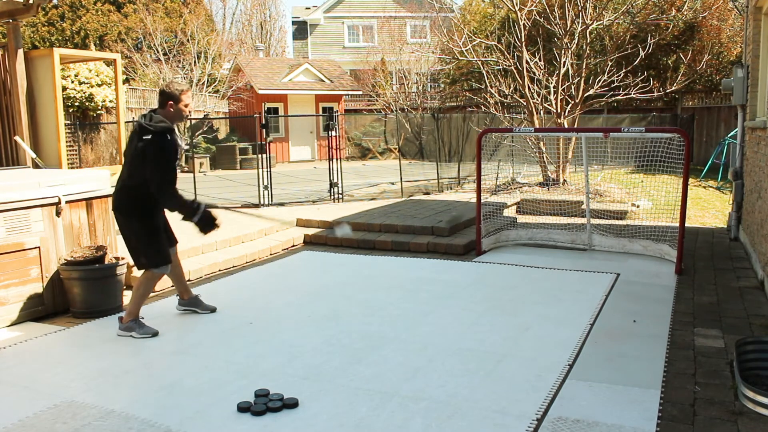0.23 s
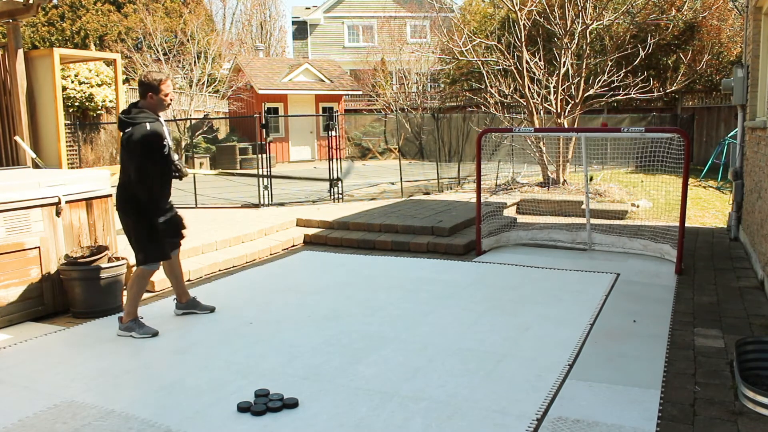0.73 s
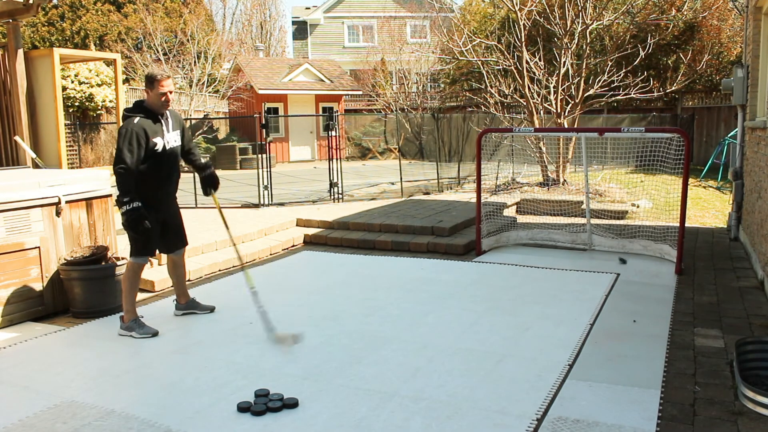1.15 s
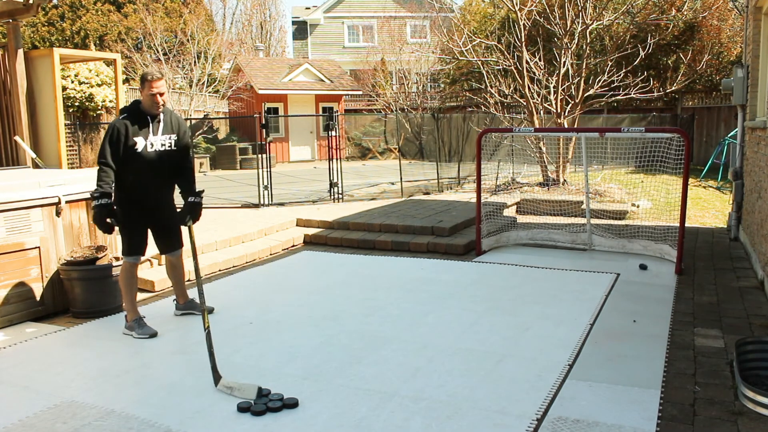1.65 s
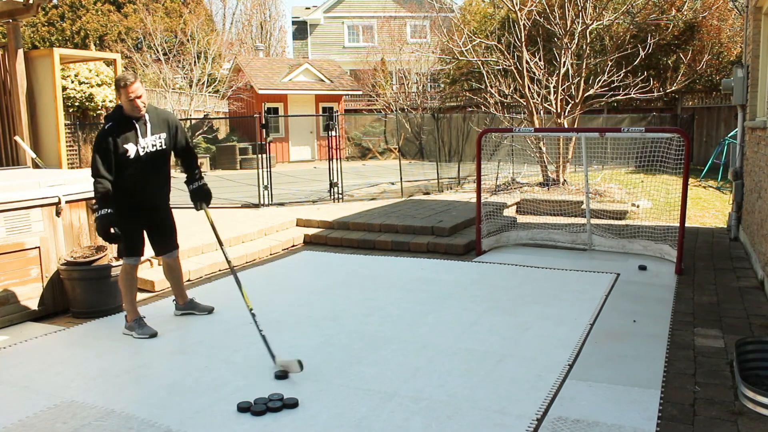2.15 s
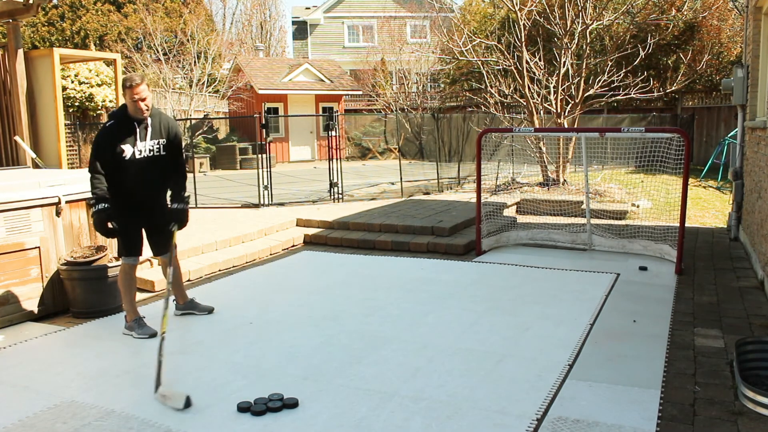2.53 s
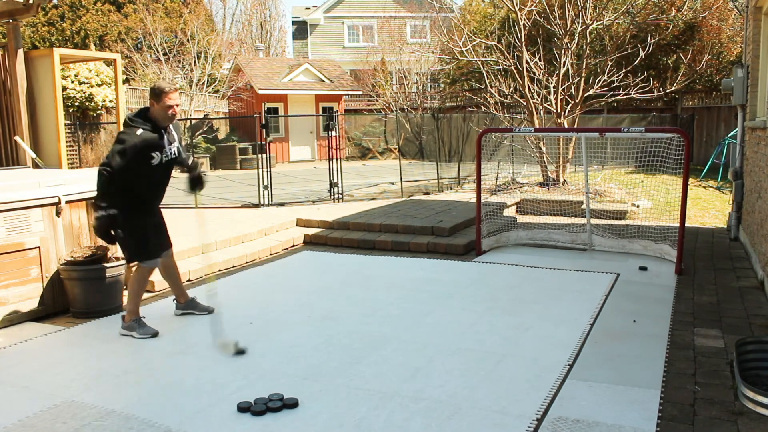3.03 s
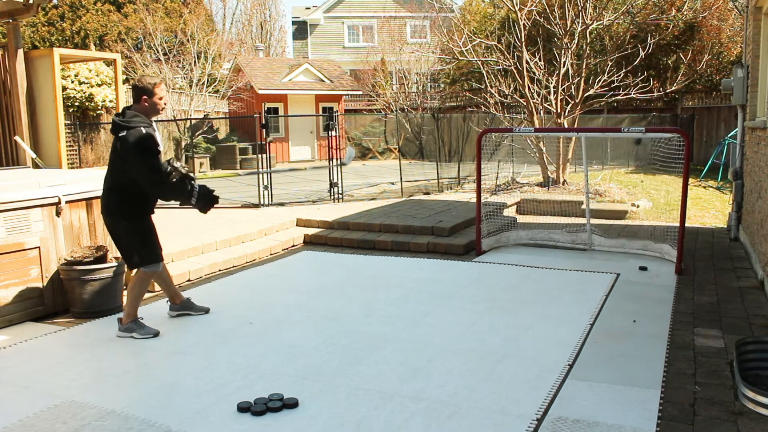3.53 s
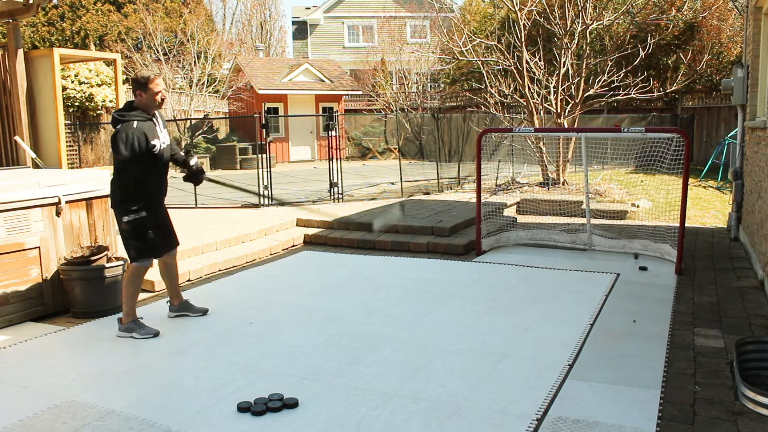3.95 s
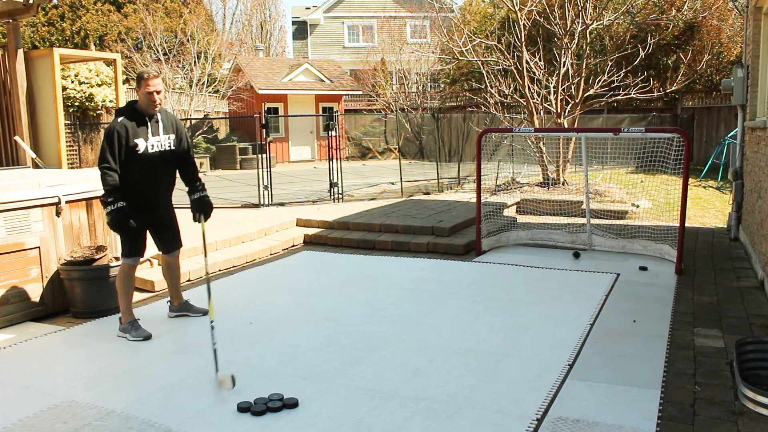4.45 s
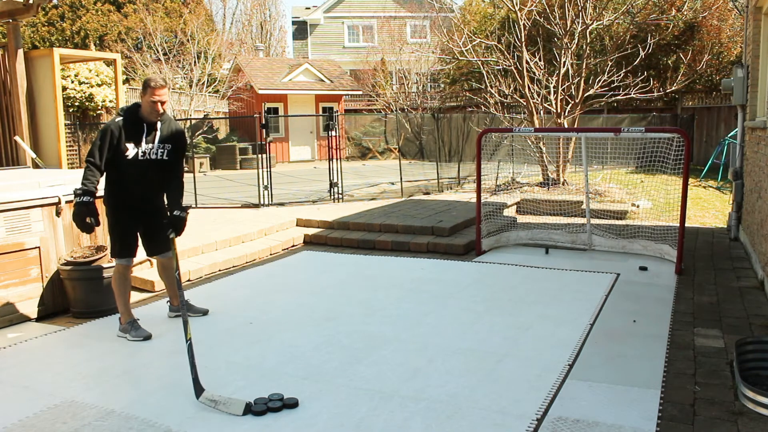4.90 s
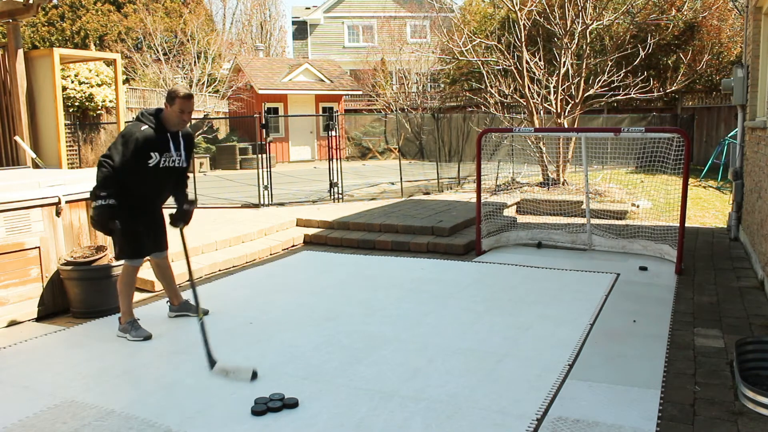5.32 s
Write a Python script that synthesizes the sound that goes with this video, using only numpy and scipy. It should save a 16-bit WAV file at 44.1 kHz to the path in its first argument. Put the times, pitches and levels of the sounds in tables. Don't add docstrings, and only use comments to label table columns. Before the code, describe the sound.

A quiet back yard with faint traffic hum and slight hiss, the stick and pucks close in stereo. A scraping sweep flicks a puck away at about 0.15 s with light clicks. It swishes into the net around 0.55 s and again at 0.8 s, with a short steel ring. A distant saw spins up from 0.2 s, whines high and thin, and stops near 3 s. A heavy puck drop at 1.05 s leads to the loudest hollow slap at 1.25 s, a softer one at 1.55, small taps and rocking, then crisp slaps at 2.15 and 2.55. Soft knocks and a second scraping flick come around 2.9 to 3.2 s, with a very faint net swish at 3.6. A bright clack at 4.0 and a low slap at 4.25 precede a long fading glide and small taps until 4.75. A last scrape swells from 5.2 s. House and fence add brief echoes.

```python
import sys
import numpy as np
from scipy import signal
from scipy.fft import rfft, irfft, next_fast_len
from scipy.io import wavfile
from scipy.ndimage import uniform_filter1d, map_coordinates

SR = 44100
rng = np.random.default_rng(int(sys.argv[2]) if len(sys.argv) > 2 else 0)


def magnitude_from_level(level_db):
    exponent = np.asarray(level_db, float) / 20
    return 10 ** exponent


def inscribe(sig):
    pcm = np.round(np.clip(np.atleast_2d(sig).T, -1, 1) * 32767)
    wavfile.write(sys.argv[1], SR, pcm.astype(np.int16))


N = 245618
TIME = np.arange(N) / SR


def unit(x):
    return x / np.sqrt(np.mean(x ** 2) + 1e-20)


def along(points, hz):
    f, v = np.transpose(points)
    return np.interp(np.log(hz + 1), np.log(f + 1), v)


def wobble(rate):
    return map_coordinates(rng.standard_normal(int(N * rate / SR) + 4), [TIME * rate], order=1)


def filtered(x, response):
    m = 2 * next_fast_len(N // 2 + SR // 4)
    gain = response(np.fft.rfftfreq(m, 1 / SR))
    return irfft(rfft(x, m) * gain / np.sqrt(np.mean(abs(gain) ** 2)), m)[..., :N]


def colour(points):
    def response(hz):
        c = irfft(np.log(magnitude_from_level(along(points, hz)) + 1e-6))
        c[1:len(c) // 2] *= 2
        c[len(c) // 2 + 1:] = 0
        return np.exp(rfft(c))[:len(hz)]
    return response


def stereo(pair):
    # frequency in Hz, left-right likeness from 0 to 1.
    alike = [(100, 0.93), (500, 0.9), (2000, 0.62), (8000, 0.1)]
    m = next_fast_len(N)
    hz = np.fft.rfftfreq(m, 1 / SR)
    turn = np.arccos(np.clip(along(alike, hz), 0, 1)) / 2
    mid, side = irfft(rfft(pair, m) * [np.cos(turn), np.sin(turn)], m)[:, :N]
    return np.array([mid + side, mid - side])


def grit(rough_db):
    return unit(rng.standard_normal((2, N)) * magnitude_from_level(rough_db * (wobble(250) + wobble(1500))))


def add(track, s, swell, t60, db):
    part = track[..., round(s * SR):][..., :SR * 3 // 4]
    t = TIME[:part.shape[-1]]
    part += magnitude_from_level(db) * (1 - np.exp(-t / swell)) * magnitude_from_level(-60 * t / t60)


def tile(f):
    # resonance in Hz, its width in Hz, level in dB.
    tile_modes = [(233, 65, -12.5), (356.3, 59.5, 3), (439.3, 114.4, 3), (524.4, 107, 5.5),
                  (649.5, 76, 4.5), (733.5, 86.5, 1.5), (950, 220, -4.5)]
    total = 0
    for k, (centre, width, db) in enumerate(tile_modes):
        sign = (-1) ** k
        total = total + sign * magnitude_from_level(db) * 1j * f * width / (centre * centre - f * f + 1j * f * width)
    return total * (1j * f / (200 + 1j * f)) ** 3


def bodies(thud, clack, crack, edge):
    # frequency in Hz, level in dB per Hz.
    blade = [(600, -34), (1000, 3.5), (1300, 1), (1900, -0.5), (2500, -2), (3100, -4), (4000, -9.5),
             (5500, -15.5), (9000, -45.5)]
    return filtered(thud, tile) + filtered(clack, colour(blade)) + filtered(crack, colour(edge))


def contacts():
    # start in seconds, tile thud in dB, blade clack in dB over the thud,
    # bright crack in dB over the thud, blade note in Hz.
    slaps = [
        (1.235, -2, -11, -14, 2044),
        (1.538, -13.5, -6, -24.5, 2630),
        (2.13, -8.5, -8, -8, 1900),
        (2.563, -4, -13.5, -16.5, 2147),
        (4.253, -2.5, -8.5, -11.5, 1570),
    ]
    landings = [
        (1.059, -3.5, -4.5, -15, 1850),
        (4.029, -20, 3, -6, 3000),
        (4.209, -12, -6.5, -24, 1750),
    ]
    snaps = [
        (0.231, -36, 9.5, -31.5, 1120),
        (3.001, -24.5, -19, -33, 1500),
        (3.046, -15.5, -24, -37, 1750),
        (3.077, -42, 2, 0, 1400),
        (3.136, -24.5, -0.5, -20.5, 1510),
        (4.018, -10.5, 7.5, -10, 2750),
        (5.453, -22.5, -7.5, -15, 1510),
    ]
    # start in seconds, tile thud in dB, blade clack in dB over the thud,
    # blade note in Hz.
    catches = [
        (0.098, -21.5, -5.5, 3140),
        (0.15, -32.5, 2.5, 1930),
        (2.201, -18.5, -25, 1770),
        (2.432, -18.5, -13.5, 2360),
        (2.48, -23, -10, 1480),
        (3.054, -24, -1, 1410),
        (3.194, -28.5, 3, 2020),
        (4.426, -25.5, -5, 1740),
    ]
    taps = [(1.358, -25.5, -27, 2370), (1.625, -26.5, -15, 1490), (2.084, -34, -9.5, 2550),
            (2.242, -22.5, 0, 1790), (2.368, -34, -6, 1550), (2.657, -17.5, -7, 1856),
            (2.878, -41, -0.5, 1624), (2.953, -26.5, -26, 1400), (4.587, -30.5, -7.5, 2600),
            (4.628, -29, -12, 1460), (4.655, -24.5, -10, 2230), (4.724, -31, -21, 1470),
            (4.747, -52, -8, 2340), (5.438, -17.5, -11, 1460)]
    rocks = [
        (1.717, -32, -17.5, 2340),
        (1.852, -32, -12.5, 2310),
        (1.966, -37, -7.5, 2710),
        (2.997, -22.5, -20, 1500),
        (4.956, -35, -16.5, 1420),
    ]
    blow_list = []
    for rows, t60 in ((slaps, .12), (landings, 0.17), (snaps, .06)):
        blow_list += [(s, db, clack, crack, t60, hz) for s, db, clack, crack, hz in rows]
    for rows, edge_db, t60 in ((catches, -11, 0.15), (taps, -32, 0.15), (rocks, -18.5, 0.32)):
        blow_list += [(s, db, clack, clack + edge_db, t60, hz) for s, db, clack, hz in rows]
    return blow_list


def blows():
    # frequency in Hz, level in dB per Hz.
    crack_edge = [(2500, -48.5), (4000, -1), (5600, -3.5), (7000, 4.5), (8300, 4), (9800, -2.5),
                  (12000, -13.5), (14000, -31), (16500, -57.5)]
    rattle, push, notes = np.zeros((3, N)), np.zeros((3, 1, N)), np.zeros((2, N))
    force = np.array([stereo(grit(rough_db=1.2)) for _ in rattle])
    for s, db, clack_db, crack_db, t60, note_hz in contacts():
        soft_db = -.12 * db
        start = round(s * SR)
        add(rattle[0], s, .0015, 1.31 * t60, db - 9)
        add(rattle[1], s, .0005, t60, db + clack_db - 2.5 - soft_db)
        add(rattle[2], s, .0003, 0.84 * t60, db + crack_db - 6.5)
        push[:, 0, start] += magnitude_from_level([db + 13.5, db + clack_db + 8.0, db + crack_db + 13])
        knock = np.zeros(SR // 4)
        add(knock, 0, .0005, 0.78 * t60, db + clack_db + 3 + 2.3 * soft_db)
        spot = slice(start, start + SR // 4)
        source = force[1][:, spot]
        resonance = signal.iirpeak(note_hz, 4.5, SR)
        once = signal.lfilter(*resonance, knock[:source.shape[1]] * source)
        notes[:, spot] += signal.lfilter(*resonance, once)
    return notes + bodies(*(rattle[:, None] * force + push), crack_edge)


def sweep_strokes():
    # release in seconds, touch in seconds before release, full pressure in seconds before release,
    # tile rumble in dB, blade rasp in dB over the rumble.
    sweeps = [
        (0.156, .38, 0.18, -30.5, 0.5),
        (3.214, 0.34, .17, -28.5, -0.5),
        (5.62, 0.46, 0.15, -29, -2),
    ]
    flick_db = 9.5
    strokes = []
    for go, touch, full, db, rasp in sweeps:
        # time in s, pressure in dB, rasp from blade speed in dB
        stages = ((go - touch, -25.5, -8),
                  (go - touch + 0.13, -11.5, 0),
                  (go - full, 0, 0),
                  (go - 0.032, -7, -1.5),
                  (go, -7, flick_db),
                  (go + 0.047, -34.5, flick_db),
                  (go + .21, -47, 2 * flick_db))
        stroke = []
        for s, press, speed in stages:
            creep_hiss_db = -3 * (s == go - touch)
            stroke.append((s, db + press, rasp + speed, rasp + speed - 9 + creep_hiss_db))
        strokes.append(stroke)
    return strokes


def glide_strokes():
    # start in seconds, length in seconds, tile rumble in dB.
    glides = [
        (1.28, .25, -30),
        (2.154, 0.33, -34),
        (4.298, 0.673, -28.5),
    ]
    skid_s, skid_hiss_db, roll_hiss_db = 0.2, -17.5, -21.5
    strokes = []
    for s, length, db in glides:
        stages = ((0, skid_hiss_db), (min(skid_s, length), skid_hiss_db),
                  (min(skid_s + 0.026, length), roll_hiss_db), (length, roll_hiss_db))
        strokes.append([(s + t, db - 40.5 * t, -14, hiss) for t, hiss in stages])
    return strokes


def slides():
    # frequency in Hz, level in dB per Hz.
    slide_hiss = [(3000, -31.5), (4500, -5.5), (6000, -3), (8500, 2.5), (10000, -4), (12000, -19),
                  (16500, -47.5)]
    corners = []
    for stroke in sorted(sweep_strokes() + glide_strokes()):
        before, after = stroke[0][0] - .02, stroke[-1][0] + .03
        corners += [(before, -90, 0, 0), *stroke, (after, -90, 0, 0)]
    times, *curves = np.transpose(corners)
    rumble_db, rasp_db, hiss_db = (np.interp(TIME, times, curve) for curve in curves)
    chatter = 3.2 * np.minimum(wobble(45), 1.1)
    levels = (rumble_db + chatter - 3.0,
              rumble_db + rasp_db + 0.36 * chatter - 2.5,
              rumble_db + hiss_db - 3.5)
    return bodies(*[magnitude_from_level(db) * stereo(grit(rough_db=1.7)) for db in levels], slide_hiss)


def goal():
    # start in seconds, level in dB, bright fizz in dB over the level,
    # steel ring in dB over the level, swish t60 in seconds.
    net_hits = [
        (0.546, -42.5, -3, -16, .15),
        (0.566, -25.5, -22.5, -31.5, 0.091),
        (0.591, -34, -13.5, -16, 0.24),
        (0.798, -23.5, -8.5, -15.5, 0.12),
        (0.819, -28.5, -3.5, 2, 0.22),
        (3.586, -51, -1.5, -14, 0.19),
        (3.601, -40.5, -19, -20.5, 0.12),
        (3.626, -39, -29, -38.5, 0.16),
        (3.67, -36, -15, -14, .14),
    ]
    # frequency in Hz, level in dB, t60 in seconds.
    frame = [(2370, -13, 1), (2360, -6.5, 0.36), (1400, -7, 0.087), (2960, 2.5, 0.099), (3990, 2.5, 0.04),
             (6400, -21.5, .25), (6670, -15, .15), (6600, -22.5, 0.45)]
    # frequency in Hz, level in dB per Hz.
    mesh_body = [(70, -39.5), (150, -10.5), (260, -12.5), (700, -2.5), (1100, -1.5), (2300, -2),
                 (5000, -12), (6500, -25), (11000, -82.5)]
    net_fizz = [(3000, -21), (4500, 0), (7000, 0), (10000, -11.5), (16000, -28)]
    swell_s = .008
    swish, fizz = np.zeros((2, N))
    tube = np.zeros((len(frame), N))
    for s, db, bright_db, ring_db, t60 in net_hits:
        add(swish, s, swell_s, t60, db - 2.5)
        add(fizz, s, swell_s, t60, db + bright_db - 2)
        for mode, (_, level_db, life) in zip(tube, frame):
            add(mode, s, 0.011 * life, life, db + ring_db + level_db)
    ring = 0
    for mode, (hz, *_) in zip(tube, frame):
        beating = magnitude_from_level(hz / 1800 * wobble(90))
        ring = ring + mode * beating * np.sin(2 * np.pi * hz * TIME)
    mesh = filtered(swish * stereo(grit(rough_db=3.0)), colour(mesh_body))
    bright = filtered(fizz * stereo(grit(rough_db=0.5)), colour(net_fizz))
    return mesh + bright + ring * magnitude_from_level([[-1.5], [1.5]])


def yard(x):
    # frequency in Hz, t60 in seconds.
    linger = [(300, 0.21), (1000, 0.61), (3000, 0.84), (6000, 0.2), (12000, 0.09)]
    hz, t, z = signal.stft(x.mean(0), SR, nperseg=256)
    hop = t[1] - t[0]
    power_in = uniform_filter1d(abs(z) ** 2, size=5, axis=0)
    keep = magnitude_from_level(-120 * hop / along(linger, hz))
    power = np.array([signal.lfilter([0, 0, 0, 1 - k], [1, -k], p) for k, p in zip(keep, power_in)])
    late = round(0.095 / hop)
    power[:, late:] += 0.056 * power[:, :-late].copy()
    noise = signal.stft(stereo(rng.standard_normal((2, N))), SR, nperseg=256)[2]
    noise = noise / np.sqrt(np.mean(abs(noise) ** 2))
    return signal.istft(noise * np.sqrt(power), SR, nperseg=256)[1][:, :N]


def saw():
    # time in seconds, tooth rate in Hz.
    saw_speed = [
        (0.199, 1870),
        (.44, 2190),
        (.7, 2370),
        (1.0, 2430),
        (1.5, 2400),
        (1.8, 2447),
        (2.08, 2603),
        (2.5, 2580),
        (3.02, 2550),
    ]
    s, hz = np.transpose(saw_speed)
    turns = np.cumsum(np.interp(TIME, s, hz) * (1 + .006 * wobble(200))) / SR
    edges = s[0], s[0] + .06, s[-1] - 0.17, s[-1]
    level = -61 + 2.5 * TIME + np.interp(TIME, edges, (-10, -0.5, -3, -15), -60, -60)
    clears_s, dulls_s = .6, 3.5
    high = -14.5 - 12 * np.exp(-(TIME / clears_s) ** 2) - 6 * (TIME / dulls_s) ** 6
    second = np.interp(TIME, (.8, 1.8, 2.9), (-4, -6, -12))
    teeth = 0
    for k, db in ((1, 0), (2, second), (3, high), (4, high - 6)):
        teeth = teeth + magnitude_from_level(db + 2.2 * wobble(40)) * np.sin(2 * np.pi * k * turns)
    plate = unit(filtered(rng.standard_normal(N), lambda f: 1 / (1 + ((f - 3540) / 170) ** 2)))
    return magnitude_from_level(level) * (teeth + magnitude_from_level(-3.5) * plate)


def suburb():
    # frequency in Hz, level in dB per Hz.
    hum = [(18, -34), (30, -19), (58, -54.5), (103, -9), (449, 0.5), (584, -9), (632, -8.5), (2830, -11),
           (3490, -14.5), (3770, -17), (4190, -14), (16000, -33.5)]
    rush = unit(filtered(stereo(rng.standard_normal((2, N))), colour(hum)))
    drone = unit(filtered(rng.standard_normal(N), lambda f: 1 / (1 + ((f - 120) / 1.5) ** 2)))
    rush_db = -46.5 - 0.79 * TIME - 8.5 + 0.44 * wobble(3.88)
    return magnitude_from_level(rush_db) * rush + magnitude_from_level(-73) * drone


def scene():
    near = blows() * magnitude_from_level([[.7], [-.7]]) + slides() * magnitude_from_level([[.8], [-.8]]) + goal()
    wet = signal.lfilter(*signal.butter(3, 210, "high", fs=SR), yard(near))
    return near + magnitude_from_level(-12.5) * wet + saw() + suburb()


def roll_off(x):
    return signal.sosfilt(signal.butter(12, 16510, fs=SR, output="sos"), x)


def record(dry):
    x = dry / (1 + abs(dry) ** 12) ** (1 / 12)
    m = 2 * next_fast_len(N // 2 + 64)
    passed = np.fft.rfftfreq(m, 1 / SR) < 16100
    mix = irfft(rfft(x, m) * passed, m)[:, :N]
    return roll_off(mix)


dry = scene()
out = record(dry)
inscribe(out)
```